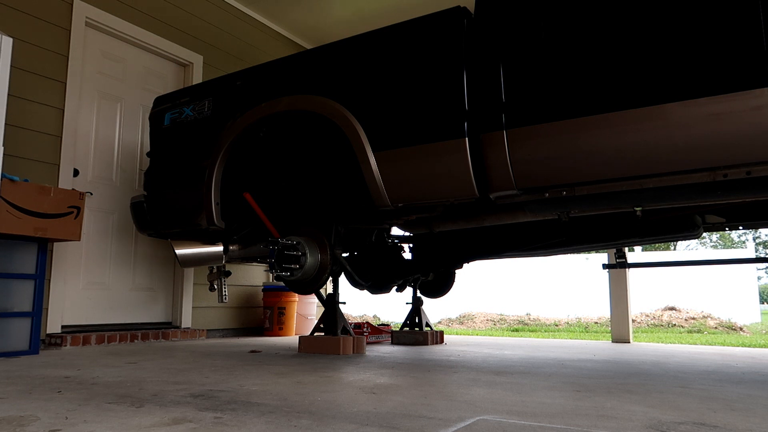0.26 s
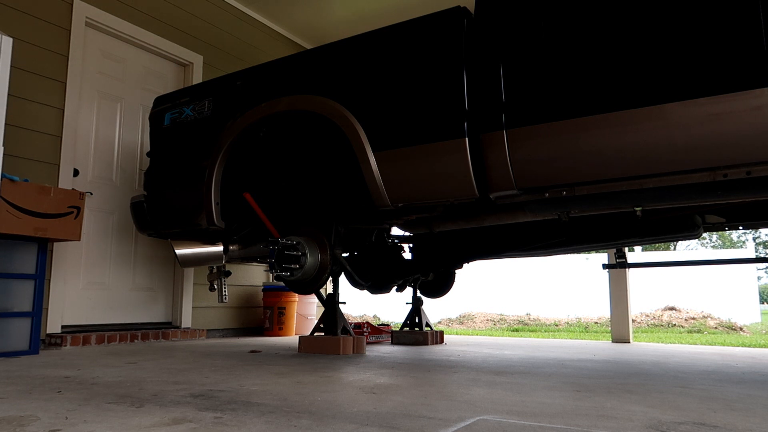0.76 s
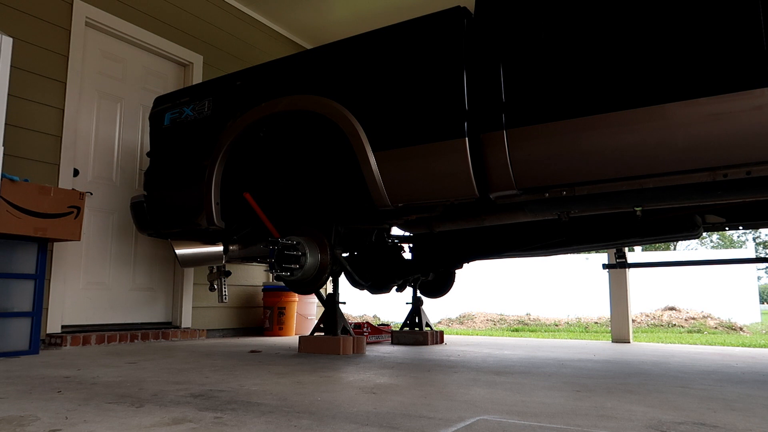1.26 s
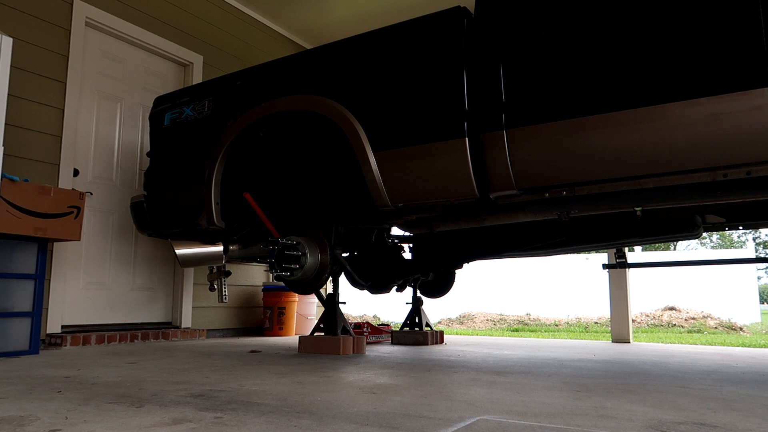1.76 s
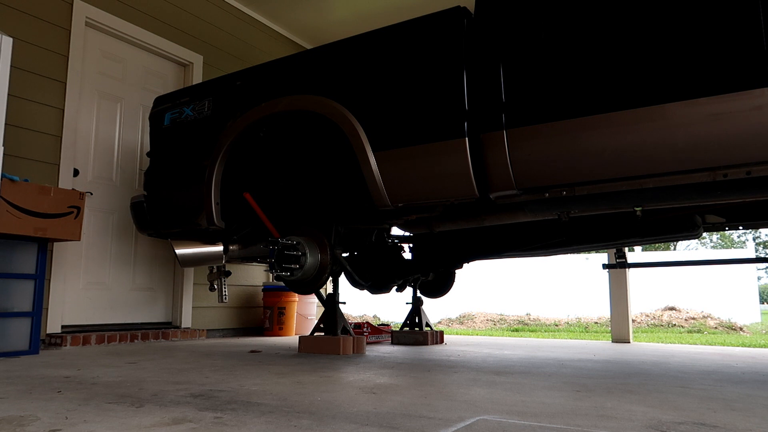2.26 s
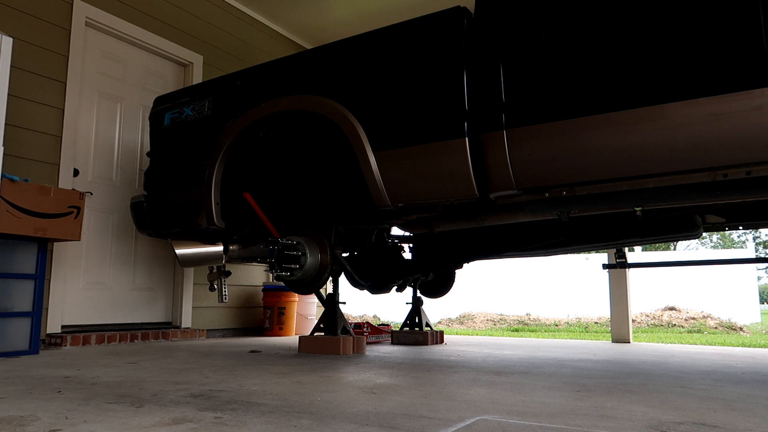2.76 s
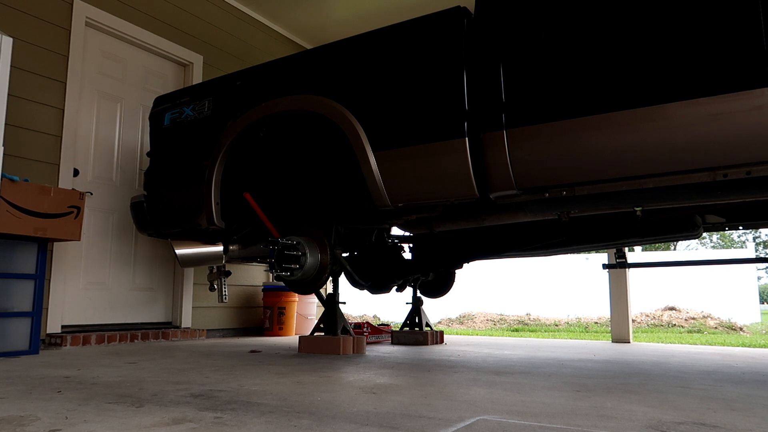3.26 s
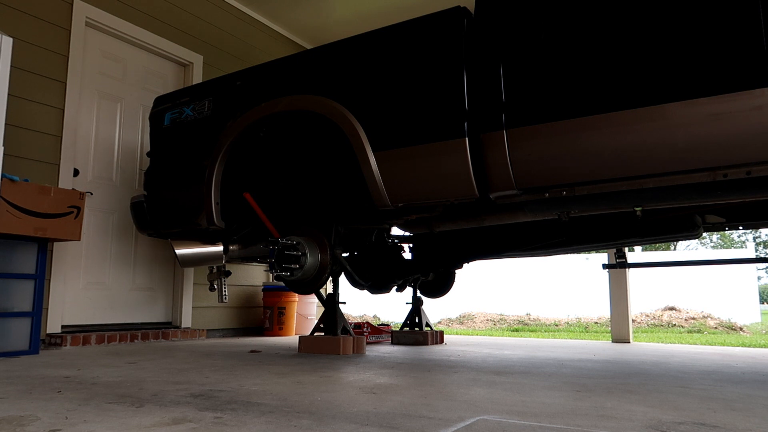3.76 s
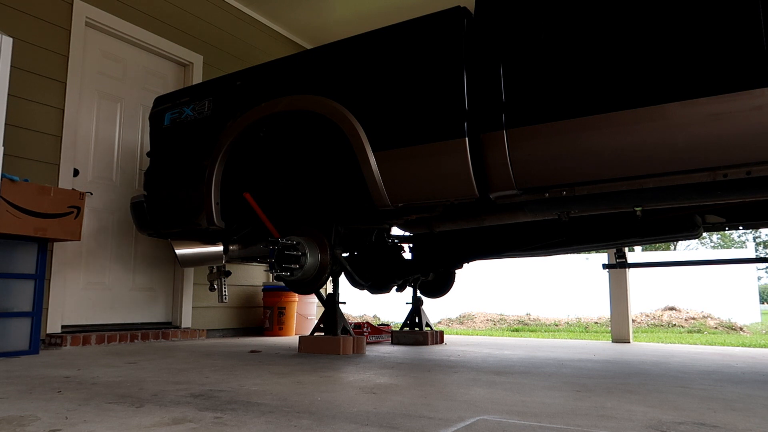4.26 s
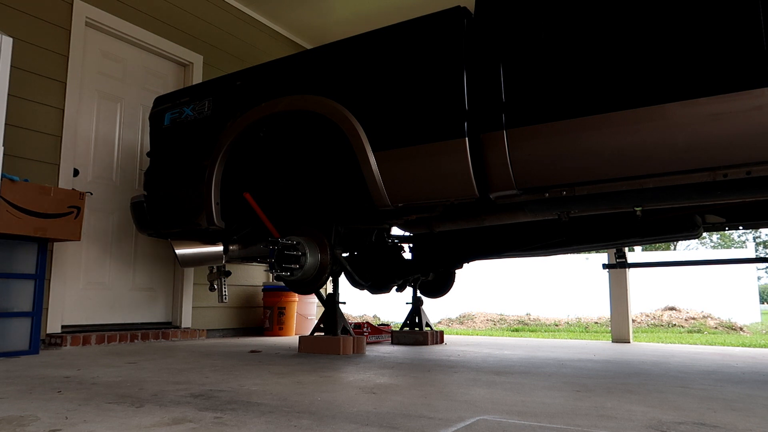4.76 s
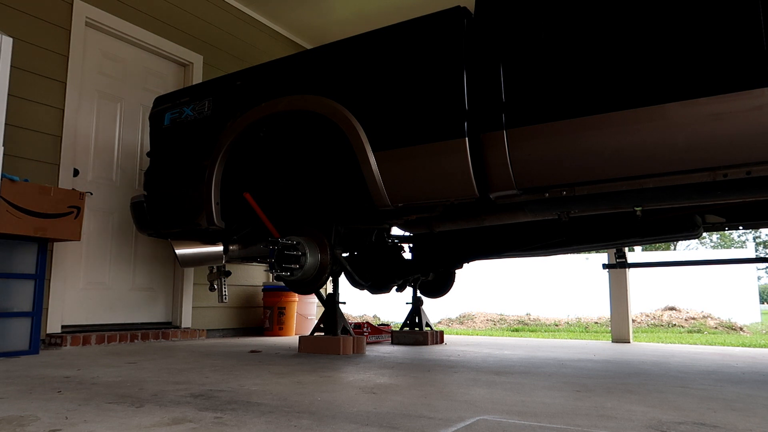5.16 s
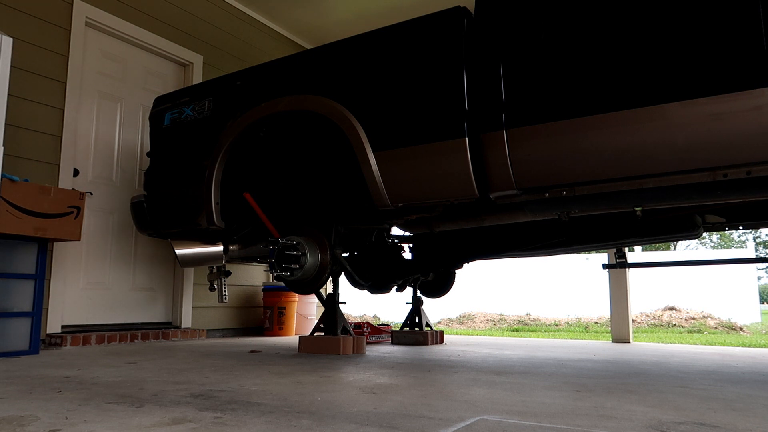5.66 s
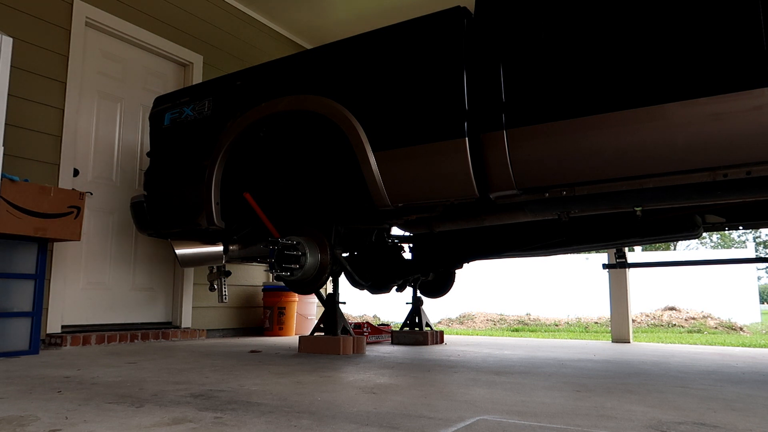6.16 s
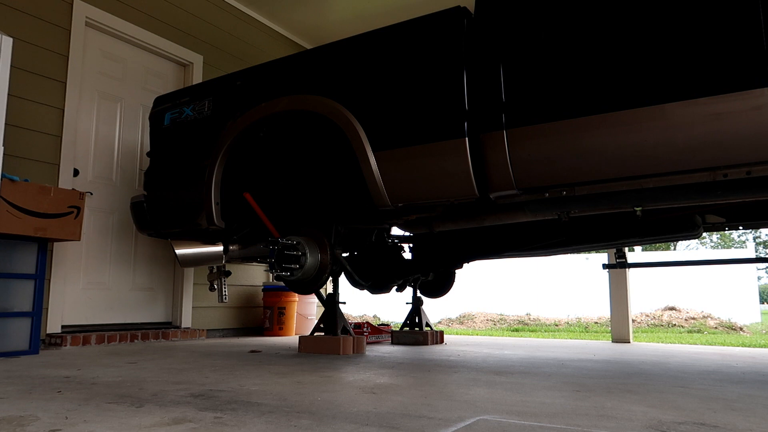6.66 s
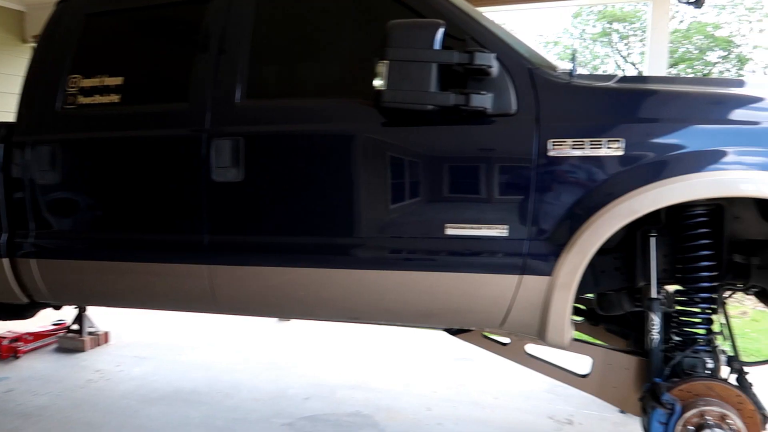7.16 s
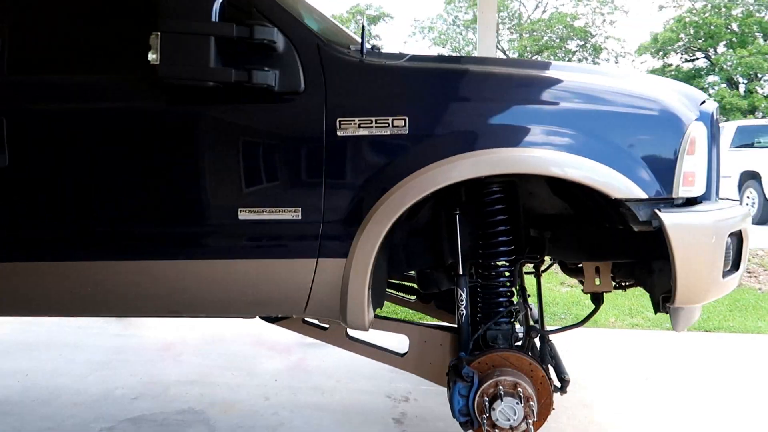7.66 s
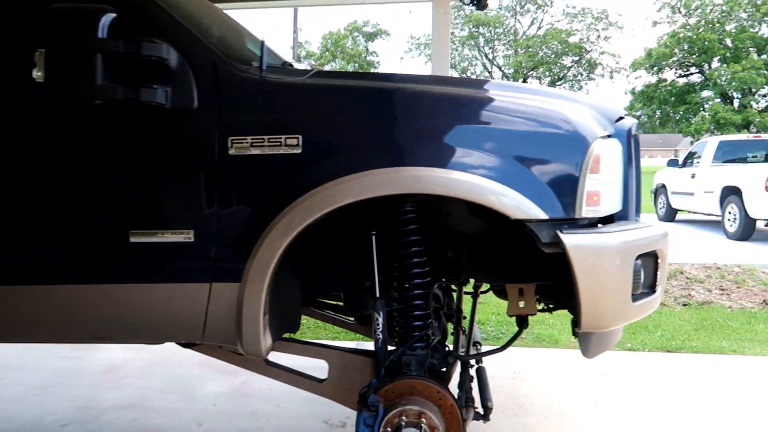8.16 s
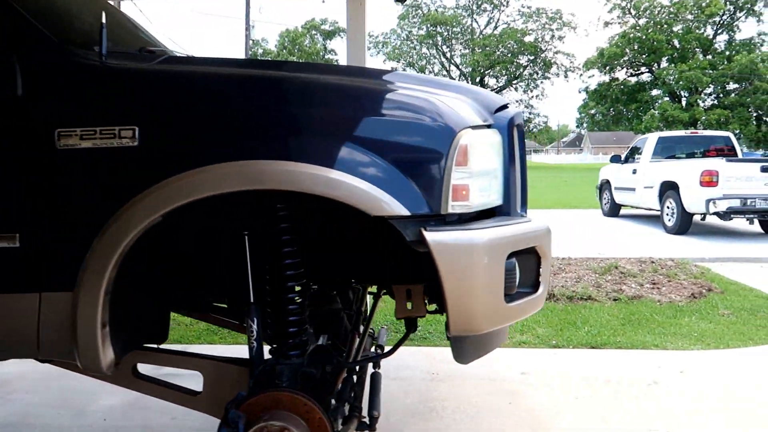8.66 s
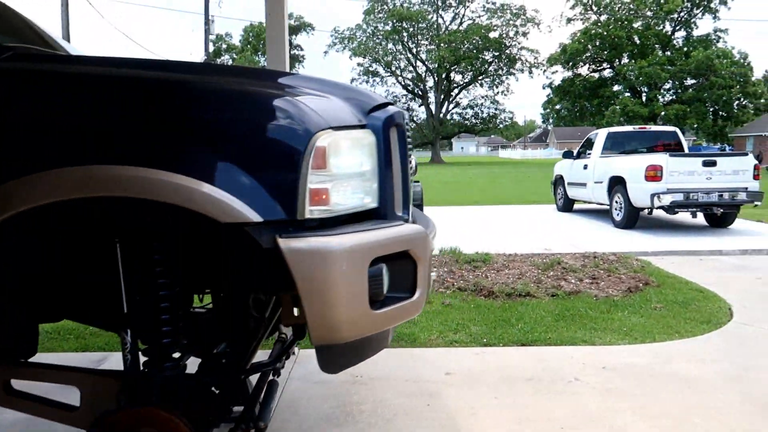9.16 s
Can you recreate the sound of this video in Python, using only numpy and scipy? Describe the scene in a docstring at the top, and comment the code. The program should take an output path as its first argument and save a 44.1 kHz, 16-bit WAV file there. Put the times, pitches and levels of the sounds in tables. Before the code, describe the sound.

A metallic clunk and rising gear whine lead into laboured cranking, each compression dragging the pitch down. The diesel fires hard, nearly dies, fires again and settles into rough loping. The microphone stands by the rear exhaust, with short reflections from slab and walls; then a sudden cut puts it beside the front wheel, with sharp injector clatter and less exhaust boom.

```python
"""A starter clunks in, whines up and cranks a V8 diesel pickup slowly on weak batteries under a carport.
Tooth mesh rings the starter housing. The engine fires with hard knocking, stumbles, catches and lopes:
firing orders and uneven pulses boom from the nearby tailpipe, with impacts and noise for clatter.
Then the listening place jumps to the front wheel, where the clatter of the engine dominates."""
import sys
import numpy as np
from scipy import signal
from scipy.fft import rfft, irfft, next_fast_len
from scipy.io import wavfile
from scipy.ndimage import uniform_filter1d

SR = 44100
rng = np.random.default_rng(int(sys.argv[2]) if len(sys.argv) > 2 else 0)


def wav_record(signal):
    """Record a signal, one row per channel, as 16-bit PCM in the file named by sys.argv[1]."""
    frames = np.transpose(np.atleast_2d(signal))
    bounded = np.clip(frames, -1, 1)
    # unit amplitude maps onto the largest positive 16-bit level
    quanta = np.round(bounded * 32767).astype(np.int16)
    wavfile.write(sys.argv[1], SR, quanta)


N = 414981
TIME = np.arange(N) / SR

# starter in, starter out, engine catches, listening place jumps to the front wheel
ENGAGE_S, RELEASE_S, CATCH_S, JUMP_S = 0.032, 2.462, 3.21, 7.265

# quiet outdoor air: (frequency [Hz], level [dB])
AIR_COLOUR = [(25, -4), (60, -0.5), (250, -5), (1000, -11.5), (4000, -27), (12000, -52)]
# stereo width while cranking, at the rear, at the front: (frequency [Hz], side less middle [dB])
WIDTH_CRANK = [(60, -52), (110, -44), (200, -67), (360, -22), (660, -21), (1200, -17.5), (2190, -10.5),
               (3980, -3), (7240, 1.5), (13200, 18)]
WIDTH_REAR = [(60, -26), (110, -13.5), (200, -14.5), (360, -19), (660, -21), (1200, -16.5), (2190, -11.5),
              (3980, -4), (7240, 0), (13200, 16)]
WIDTH_FRONT = [(60, -29), (110, -34), (200, -41), (360, -26), (660, -34), (1200, -19.5), (2190, -14.5),
               (3980, -5), (7240, -2), (13200, 15.5)]
# position of starter and engine before the microphone: (time [s], left less right [dB])
PAN = [(0, -1.6), (2.3, -1.4), (3, -.1), (7.25, 0), (7.7, .5), (9.4, 1.7)]

# pinion striking the ring gear: (frequency [Hz], level [dB])
CLUNK_COLOUR = [(60, -19), (200, -3), (300, 5), (460, -4), (900, -11), (1500, -8), (2000, -6), (3000, -17),
                (5500, -18.5), (8500, -28), (13000, -39)]
# starter runs up, is dragged down by the first compression and recovers:
# (time [s], tooth mesh [Hz], level of each whining harmonic, three columns [dB])
RUN_UP_PITCH = [(.06, 225, -32, -38, -37), (.125, 255.8, -16, -25, -26), (.165, 271, -17, -34, -21),
                (.19, 291, -18, -38, -18), (.215, 305.7, -29, -38, -14.5), (.243, 280.4, -12, -38, -24),
                (.285, 253, -26, -26, -40), (.325, 239.5, -30, -24, -43), (.365, 241, -34, -20, -40),
                (.395, 290, -36, -43, -42), (.425, 326, -27, -40, -27), (.462, 278, -15, -37, -33),
                (.495, 253, -24, -17, -34), (.53, 250.5, -32, -20.5, -40), (.56, 243.6, -32, -33, -42)]
# which multiples of the tooth mesh whine: (multiple)
WHINE_HARMONICS = [3, 5, 6]
OVERTONE_DB = -18  # each whine carries its octave

# starts of the first slow strokes: (time [s])
RUN_UP_STROKES = [-.04, .18, .432]
# compression strokes while cranking: (time [s], relative level of the chuff [dB])
COMPRESSIONS = [(.563, -20), (0.688, -18.5), (.818, -20), (.944, -17), (1.073, -19.5), (1.198, -21.5),
                (1.338, -20.5), (1.483, -21), (1.619, -18), (1.751, -22), (1.887, -21.5), (2.032, -24),
                (2.173, -23.5), (2.311, -24), (2.457, -22.5)]
# starter housing rings under each stroke: (frequency [Hz], width [Hz], relative level [dB],
# loudest place [share of stroke], length [share of stroke], swell before labouring deepens it [dB])
HOUSING = [(755.4, 35, -18.5, 0.45, 0.14, 12), (812, 35, -21.5, 0.54, 0.19, 11),
           (1205, 43, -19.5, .13, 0.044, 23), (1202, 130, -23, 0.42, 0.16, 10.5),
           (1946, 110, -37, 0.48, 0.28, 4)]
# gear rattle and growl: (frequency [Hz], level [dB])
RATTLE_COLOUR = [(21, -47), (35, -9), (64, -19), (142, -16.5), (278, -2), (357, -8), (649, -8), (754, -1.5),
                 (921, -4.5), (1210, -6), (1340, -9), (2000, -4), (3290, -20), (6780, -29.5),
                 (13600, -56.5)]
MESH_HZ, SAG_HZ_PER_S = 299.9, 8.2  # tooth mesh at the fast point of a stroke, as extrapolated to time 0
RING_EVEN_S = .018  # span over which the housing rings are levelled
LOAD_DB, LOAD_RISE_DB_PER_S = -1.5, 1.33  # how hard the teeth ring the housing
RATTLE_DB, RATTLE_FADE_DB_PER_S, RUN_UP_DB = -16.5, 1.05, -4  # rattle; its change during the run-up
GROWL_DB = -6  # beside the rattle
# the gears bite at once, hold for part of the stroke, then slacken until LATE_AT
BITE_SHARE, HOLD_SHARE, SLACK_DB = 0.079, 0.36, -5.5  # labouring scales the slack
LATE_DB, LATE_AT, LATE_SHARE = 0.5, 0.87, 0.054  # slight swell late in the stroke: level, place, length
CHUFF_HZ, CHUFF_RISE_S, SHUDDER_HZ, SHUDDER_DB = 256.2, 0.016, 47.1, 7

# engine speed: (time [s], firings per second [Hz])
SPEED = [(2.47, 14), (2.78, 47), (2.9, 48), (3.17, 42), (3.3, 46), (3.65, 48.9), (4.35, 49), (4.65, 47.8),
         (5.7, 46.25), (6.4, 46.55)]
FIRST_CYLINDER_S = 4.7648  # here the firing count is zero
# in firing order: (exhaust pulse strength [ratio], lateness [firing intervals], knock [dB])
CYLINDERS = [(1.6, .01, 1.2), (.7, 0, .2), (.95, .03, -1), (.75, .03, 0), (.8, .06, .3), (1.3, .03, -1),
             (1.2, 0, .4), (.75, .03, 1)]
# bursts of hard cold firing, each ending in a flare from the pipe:
# (start [s], end [s], knock [dB], flare relative to idle [dB])
BURSTS = [(2.46, 2.783, -20.5, 3), (3.108, 3.245, -23.5, -2.5)]
BURST_RISE_S, BURST_FALL_S, COAST_DB = 0.021, 0.05, -41  # between bursts the engine coasts
FLARE_LAG_S, FLARE_RISE_S, FLARE_FALL_S = 0.017, 0.031, 0.1
BURST_PUSH_DB, COAST_PUSH_DB = -16, -21  # exhaust strength relative to the idle
BUILD_S, BUILD_DB = 0.6, -3  # the idle takes this long to build, from this level
# how hard the idling engine works: (time [s], reference level for clatter and rush [dB])
EFFORT = [(3.45, -32.5), (3.48, -31.5), (4.34, -28), (4.39, -31.5), (4.62, -34.5), (5.18, -35), (6.05, -30),
          (7.2, -31)]
# clatter and gas rush follow the effort fully, the boom by a share
CLATTER_DB, RUSH_DB, LOPE_DB, BOOM_FOLLOWS = 5, 7.5, -22.5, 0.16
# firing orders of the boom: (multiple of firing rate, relative level [dB], change once settled [dB],
# cold lope [dB])
MAIN_ORDERS = [(2, -21.5, 2.5, 1.5), (3, -29.5, -10, 4), (4, -24.5, -1.5, -3), (5, -21, -1.5, -0.5)]
# fainter orders: (multiple of firing rate, relative level [dB])
MINOR_ORDERS = [(1, -37.5), (6.375, -34), (8.25, -42), (9.125, -39), (12.25, -45), (13, -46)]
# an order swells as it crosses these pipe resonances: (frequency [Hz], width [Hz], swell [dB])
PIPE_MODES = [(143.5, 5.5, 9), (241.3, 11, 4)]
# uneven pulses from the pipe: (frequency [Hz], level [dB])
PIPE = [(25, -40), (45, -24), (64, 0), (100, -9), (125, 2), (165, 5), (205, 21.5), (250, 19), (300, 5),
        (330, -12.5), (420, -0.5), (520, -36), (620, -16), (900, -63)]
# gas rushing from the pipe: (frequency [Hz], level [dB])
RUSH_COLOUR = [(25, -30), (45, -15), (65, 2.5), (130, 0.5), (280, -7.5), (430, -5.5), (540, -18),
               (620, -7.5), (900, -48), (2000, -73)]
SETTLE_S, SETTLING_S = 5.3, 0.46  # when the idle begins to settle, and how long it takes
COLD_LOPE_AT, WARM_S = 0.4, 4.34  # cold boom swells at this share of each engine cycle, until this time
RAGGED_DB = -5.5  # ragged firing weakens the clean orders, per unit of scatter
# engine noise that returns alike in every cycle: (frequency [Hz], share of power [ratio])
REPEATS = [(150, .98), (450, .85), (1000, .4), (2000, .12), (4000, .02)]
COLD_REPEATS = .5  # cold share of the repeating noise

# hard cold knocking: (frequency [Hz], level [dB])
KNOCK_COLOUR = [(100, -6), (200, -4.5), (340, -2.5), (600, -6.5), (730, -7.5), (1230, -3.5), (1860, -5.5),
                (2880, -9.5), (4370, -22), (6000, -21.5), (9400, -26.5), (10300, -42), (13600, -51)]
# idle clatter heard from the rear, from the front: (frequency [Hz], level [dB])
REAR_COLOUR = [(350, -3), (600, -7.5), (832, -12), (948, -8.5), (1230, -9), (1350, -8.5), (1780, -15.5),
               (2990, -18.5), (4610, -30), (5050, -30.5), (5760, -34), (8300, -37.5), (11800, -54),
               (12800, -53), (13600, -101)]
FRONT_COLOUR = [(150, -39), (250, -38), (272, -28), (367, -4), (568, -13), (754, -7), (907, -7), (1270, -3),
                (1380, -4.5), (2880, -11), (4160, -21.5), (5080, -23.5), (8260, -32), (11900, -45),
                (13600, -50)]
# engine casting resonances: (frequency [Hz], width [Hz], lift [dB])
BLOCK = [(757, 56, 2.5), (1250, 90, -1), (2890, 190, 3), (5060, 270, 6), (8270, 380, 3)]
# single hard firings within, between and after the bursts: (time [s], level [dB])
HARD_FIRINGS = [(2.473, -16), (2.547, -11.5), (2.601, -13.5), (2.645, -15), (2.684, -14), (2.711, -19),
                (2.738, -17.5), (2.764, -17), (2.788, -21), (3.012, -37), (3.038, -38), (3.063, -30.5),
                (3.093, -25.5), (3.124, -22), (3.152, -24), (3.19, -21), (3.215, -26)]
HARD_FIRING_RISE_S, HARD_FIRING_FALL_S = .003, 0.021
KNOCK_START_S = 2.468
# each firing knocks, then dies away:
# (place [firing intervals], depth before each cylinder's own knock [dB], decay [firing intervals])
REAR_KNOCK = (.4, 2.8, .25)
FRONT_KNOCK = (.35, 3.6, .5)
FIRING_SCATTER_DB = .5

# single hard pops from the pipe as cold cylinders fire: (time [s], level [dB])
POPS = [(2.793, -5), (2.815, -6), (2.838, -9), (3.24, -12.5), (3.26, -9), (3.303, -9), (3.475, -6.5),
        (4.11, -16), (4.37, -5)]
POP_WIDTH_S = 0.0013

# hum of the engine bay: (multiple of firing rate, level [dB])
BAY_ORDERS = [(1, -39.5), (2.001, -45), (2.499, -32.5), (3, -39.5), (3.999, -40), (4.75, -39),
              (5.25, -49.5), (8.001, -41)]
# throb and rumble of the engine bay: (frequency [Hz], level [dB])
BAY_COLOUR = [(30, -18), (55, -11), (90, 7), (125, 8), (220, 8), (290, 0), (370, 2.5), (500, -43),
              (900, -35), (4000, -70)]
FRONT_DB, FRONT_FADE_DB_PER_S = -16, 1.0  # clatter at the front wheel, fading as the listener moves on
BAY_DB, BAY_FADE_DB_PER_S = -25.5, 3  # about the level of throb and rumble there
PANEL_HZ, PANEL_WIDTH_HZ, PANEL_DB, PANEL_FADE_DB_PER_S = 1239, 59, -23.5, 4

CEILING, EDGE_HZ = 0.74, 13300  # peaks round off towards the ceiling; upper band limit


def amp(db):
    """Decibels to gain."""
    return 10 ** (np.asarray(db) / 20)


def evened(x):
    """Scales to rms 1."""
    return x / np.sqrt(np.mean(x ** 2) + 1e-20)


def curves(rows):
    """The columns of a table of timed rows, sample by sample."""
    s, *columns = np.transpose(rows)
    return [np.interp(TIME, s, c) for c in columns]


def bump(hz, centre, width, lift_db):
    """Decibels that a resonance adds at a frequency."""
    return lift_db / (1 + (2 * (hz - centre) / width) ** 2)


def colour(x, points, modes=()):
    """Filters by a smooth spectrum with resonant bumps on it."""
    size = next_fast_len(N)
    hz = np.fft.rfftfreq(size, 1 / SR)
    f, db = np.transpose(points)
    shape_db = np.interp(np.log(hz + 1), np.log(f + 1), db)
    shape_db = shape_db + sum(bump(hz, *mode) for mode in modes)
    return irfft(rfft(x, size) * amp(shape_db), size)[..., :N]


def wander(hz):
    """Smooth chance of rms 1 that changes hz times a second."""
    return evened(np.interp(TIME * hz, np.arange(N // 8), rng.standard_normal(N // 8)))


def gate(start, end, rise, fall):
    """Opens from start and shuts after end; all in seconds."""
    return np.clip((TIME - start) / rise, 0, 1) * np.clip(1 - (TIME - end) / fall, 0, 1)


def resonate(x, hz, width):
    """A steep resonance: the same peak filter twice."""
    b, a = signal.iirpeak(hz, hz / (1.45 * width), SR)
    return signal.lfilter(b, a, signal.lfilter(b, a, x))


def add(mix, start, sound):
    """Mixes a sound in from a sample on."""
    part = mix[..., start:start + sound.shape[-1]]
    part += sound[..., :part.shape[-1]]


def spread(pair, width):
    """Two unrelated signals become the middle and the sides of a stereo sound."""
    side = colour(pair[1], width)
    return np.array([pair[0] + side, pair[0] - side])


def carport(x, t60, wet_db):
    """Slab, wall and roof add dense short echoes."""
    t = np.arange(SR // 2) / SR
    echoes = rng.standard_normal(len(t)) * (rng.random(len(t)) < .05)
    tail = echoes * amp(-60 * t / t60) * (t > .004)
    wet = signal.oaconvolve(x, tail / np.linalg.norm(tail))[:N]
    return (x + amp(wet_db) * wet) / np.hypot(1, amp(wet_db))


def clatter(envelope, spectrum, width, grain_db, modes=(), hits=0, fired=None):
    """Swarms of small impacts and larger hits ring in castings and bodywork, following any engine cycle."""
    small = rng.standard_normal((2, N))
    if fired is not None:
        small[0] = cycling(fired)
    swarm = (small * amp(grain_db * wander(450)) + hits) * envelope
    rung = np.array([carport(x, t60=0.12, wet_db=-8) for x in swarm])
    return spread(evened(colour(rung, spectrum, modes)), width)


def cycling(count, warm=1):
    """Noise whose lower part repeats each engine cycle, more so when warm, while the treble is always new."""
    orders = np.arange(4097)
    phases = np.exp(2j * np.pi * rng.random(len(orders)))
    strengths = amp(2.35 * rng.standard_normal(len(orders)))
    uneven_only = orders % len(CYLINDERS) > 0  # leaves out what all cylinders share
    cycle = evened(irfft(phases * strengths * uneven_only))
    place = np.arange(len(cycle)) / len(cycle)
    same = np.interp(count / len(CYLINDERS), place, cycle, period=1)
    low, high = rng.standard_normal((2, N))
    repeated = np.sqrt(warm) * same + np.sqrt(1 - warm) * low
    repeat_colour = [(hz, 10 * np.log10(share)) for hz, share in REPEATS]
    new_colour = [(hz, 10 * np.log10(1 - share)) for hz, share in REPEATS]
    return colour(repeated, repeat_colour) + colour(high, new_colour)


def outdoor_air():
    """Steady coloured noise stands for quiet air around the carport."""
    return amp(-34) * evened(colour(rng.standard_normal(N), AIR_COLOUR))


def engagement():
    """The solenoid slams the pinion in with a clunk, and the motor whines up to speed."""
    age = np.maximum(TIME - ENGAGE_S, 0)
    crash = clatter(1, CLUNK_COLOUR, WIDTH_CRANK, grain_db=-2.5) * amp(-14.0 - 60 * age / 0.48)
    thud = np.sin(2 * np.pi * 280 * age) * amp(-11.5) * np.exp(-((TIME - .06) / 0.012) ** 2)
    mesh_hz, *levels_db = curves(RUN_UP_PITCH)
    teeth = 2 * np.pi * np.cumsum(mesh_hz * (1 + .012 * wander(400))) / SR
    whine = 0
    for k, db in zip(WHINE_HARMONICS, levels_db):
        whine = whine + amp(db) * (np.sin(k * teeth) + amp(OVERTONE_DB) * np.sin(2 * k * teeth))
    whine = whine * amp(2.5 * wander(141.7)) * gate(ENGAGE_S, .55, .01, 0.044)
    whine = carport(whine, t60=.15, wet_db=-7)
    return (crash + thud + whine) * gate(ENGAGE_S, 0.72, 0.0054, .1)


def strokes():
    """The count of compression strokes so far, with its fraction."""
    times = np.concatenate([RUN_UP_STROKES, np.transpose(COMPRESSIONS)[0]])
    return np.interp(TIME, times, np.arange(len(times)))


def housing_rings(mesh, stroke, labour):
    """Tooth mesh and noise ring the starter housing, each resonance loudest at its place in the stroke."""
    drive = carport(mesh, t60=.3, wet_db=-2) + .4 * rng.standard_normal(N)
    rings = 0
    for hz, width, db, loudest, length, swell_db in HOUSING:
        ring = resonate(drive, hz, width)
        # levelled, so that chance swells of the ring are evened out
        ring = ring / np.sqrt(abs(uniform_filter1d(ring ** 2, int(RING_EVEN_S * SR))) + 1e-12)
        away = (stroke - loudest + .5) % 1 - .5
        rings = rings + ring * amp(db + labour * swell_db * (np.exp(-(away / length) ** 2) - 1))
    return rings * amp(LOAD_DB + LOAD_RISE_DB_PER_S * TIME)


def starter():
    """The pinion drives the ring gear; every compression drags the pitch down and loads the teeth."""
    stroke = strokes()
    share = stroke % 1
    labour = np.interp(TIME, [.5, 2.3], [.8, 1.25])  # the chugs deepen as the batteries sag
    top_hz = MESH_HZ - SAG_HZ_PER_S * TIME
    mesh_hz = top_hz * (1 - .27 * np.sin(np.pi * (stroke - .07)) ** 2)
    teeth = 2 * np.pi * np.cumsum(mesh_hz * (1 + 0.0134 * wander(250))) / SR
    mesh = evened(sum(np.cos(k * teeth) for k in range(2, 11)))
    rings = housing_rings(mesh, stroke, labour) * gate(0.515, RELEASE_S - .05, 0.075, 0.055)

    loaded = gate(RUN_UP_STROKES[1] + .05, RELEASE_S - .035, .02, 0.044)
    slack = np.interp(share, [0, BITE_SHARE, HOLD_SHARE, LATE_AT], [1, 0, 0, 1]) * loaded
    strain = amp(SLACK_DB * labour * slack + 0.94 * wander(130))
    rattle = clatter(strain * amp(0.14 * np.cos(teeth)), RATTLE_COLOUR, WIDTH_CRANK, grain_db=0.5)
    # the upper mesh harmonics growl down and up through the bell housing
    growl = evened(colour(carport(mesh, t60=0.47, wet_db=-19), RATTLE_COLOUR)) * strain
    run_up_db = RUN_UP_DB * (1 - gate(0.4, JUMP_S, 0.22, .1))
    gears = (rattle + amp(GROWL_DB) * growl) * amp(RATTLE_DB - RATTLE_FADE_DB_PER_S * TIME + run_up_db)
    late_swell = amp(LATE_DB * np.exp(-((share - LATE_AT) / LATE_SHARE) ** 2) * loaded)
    return late_swell * (rings + gears * gate(ENGAGE_S, RELEASE_S, 0.026, 0.082))


def chuffs():
    """Every compression stroke opens with a low, shuddering chuff of tone and resonant noise."""
    t = np.arange(SR // 6) / SR
    shudder = amp(SHUDDER_DB * np.cos(2 * np.pi * SHUDDER_HZ * (t - .008)))
    shape = t / CHUFF_RISE_S * np.exp(1 - t / CHUFF_RISE_S) * shudder
    out = np.zeros(N)
    for s, db in COMPRESSIONS:
        breath = evened(resonate(rng.standard_normal(len(t)), 263, 99))
        gas = np.sin(2 * np.pi * CHUFF_HZ * t) + .5 * breath
        add(out, round(s * SR), amp(db) * shape * gas)
    return out


def firings():
    """The count of firings so far, with its fraction."""
    count = np.cumsum(curves(SPEED)[0]) / SR
    return count - np.interp(FIRST_CYLINDER_S, TIME, count)


def burst(start, end):
    """Cold firing builds up, holds and dies away."""
    build = 1 - np.exp(-np.maximum(TIME - start, 0) / BURST_RISE_S)
    return build * np.exp(-np.maximum(TIME - end, 0) / BURST_FALL_S)


def push():
    """Exhaust strength, 1 at built-up idle: weak while the engine coasts, flaring just after each burst."""
    build = amp(BUILD_DB * (1 - gate(CATCH_S, JUMP_S, BUILD_S, .1)))
    idle = gate(CATCH_S, JUMP_S, 0.032, .1) * build
    strength = amp(COAST_PUSH_DB) + (1 - amp(COAST_PUSH_DB)) * idle
    for start, end, _, flare_db in BURSTS:
        age = TIME - end - FLARE_LAG_S
        flare = np.exp(-np.maximum(-age / FLARE_RISE_S, age / FLARE_FALL_S))
        strength = strength + amp(BURST_PUSH_DB) * burst(start, end) + amp(flare_db) * flare
    return strength


def lope(count, scatter, spectrum, lead):
    """Strong, weak, early and late cylinders: how the pulses depart from an even train."""
    strength, late, _ = np.transpose(CYLINDERS)
    number = np.arange(np.ceil(count[0]) + 1, count[-1] - 1).astype(int)
    even_at = np.searchsorted(count, number - lead)
    chance = rng.standard_normal((len(number), 2)).T * scatter[even_at]
    lateness = late[number % 8] - late.mean() + 0.16 * chance[1]
    true_at = np.searchsorted(count, number - lead + lateness)
    pulses = np.zeros(N)
    pulses[np.minimum(true_at, N - 1)] = strength[number % 8] / strength.mean() + chance[0]
    pulses[even_at] -= 1
    boom = colour(pulses, spectrum)
    return boom / np.sqrt(abs(uniform_filter1d(boom ** 2, SR // 3)) + 1e-12)


def exhaust_orders(count, scatter):
    """Multiples of the firing rate boom in the pipe and swell as they cross its resonances."""
    speed = curves(SPEED)[0]
    settled = gate(SETTLE_S, JUMP_S, SETTLING_S, .1)
    turn = 2 * np.pi * (count + 0.019 * scatter * wander(40))
    lope_swing = np.cos(2 * np.pi * (count / len(CYLINDERS) - COLD_LOPE_AT))
    cold_lope = lope_swing * gate(CATCH_S, WARM_S, 0.22, 0.15)
    dispersion = .1  # the pipe delays the orders unequally [radians], which rounds off each pulse
    boom = 0
    for k, db, change_db, lope_db in MAIN_ORDERS:
        swell_db = sum(bump(k * speed, *mode) for mode in PIPE_MODES)
        level = amp(db + change_db * settled + lope_db * cold_lope + swell_db)
        boom = boom + level * np.cos(k * turn - dispersion * (k - 2) ** 2)
    minor = sum(amp(db) * np.cos(k * turn) for k, db in MINOR_ORDERS)
    return boom + minor * gate(2.9, JUMP_S, 0.71, 0.0087), turn


def tailpipe(count):
    """Orders, uneven pulses and gas rush leave the pipe; ragged combustion grows steadier."""
    effort_db = curves(EFFORT)[0]
    scatter = np.interp(TIME, [2.8, 4.7], [0.44, 0.034])
    boom, turn = exhaust_orders(count, scatter)
    uneven = lope(count, scatter, PIPE, lead=-.012) * amp(LOPE_DB)
    warmth = np.clip((TIME - CATCH_S) / (WARM_S - CATCH_S), 0, 1)
    warm = COLD_REPEATS + (1 - COLD_REPEATS) * warmth
    puffs = cycling(count, warm) * amp(2.0 * np.cos(turn))
    rush = evened(colour(puffs, RUSH_COLOUR)) * amp(effort_db + RUSH_DB)
    pulses = np.sqrt(2) * boom * amp(RAGGED_DB * scatter) + uneven
    pulses = pulses * amp(BOOM_FOLLOWS * (effort_db - effort_db.mean()))
    return (pulses + rush) * push() * gate(RELEASE_S, JUMP_S, .02, 0.005)


def impacts(fired, scatter_db, ring_s, count):
    """Valves and injectors: each part strikes at its place in the cycle with its own ring and varied force."""
    t = np.arange(SR // 50) / SR
    places = (np.arange(count) + rng.random(count)) / count
    pitches = rng.permutation(np.linspace(700, 5500, count))
    cycles = np.arange(fired[0], fired[-1], len(CYLINDERS))
    out = np.zeros((2, N))
    for place, hz in zip(places, pitches):
        crack = rng.standard_normal((2, len(t)))
        ring = evened((crack + .4 * evened(resonate(crack, hz, 900))) * np.exp(-t / ring_s))
        late = .02 * rng.standard_normal(len(cycles))  # in firing intervals
        for start in np.searchsorted(fired, cycles + place * len(CYLINDERS) + late):
            add(out, start, ring * amp(scatter_db * rng.uniform(-1, 1)))
    return evened(out)


def knocks(count, knock, sway_db, loudest):
    """The clatter jumps with each firing and sways over the eight cylinders, most at the loudest one."""
    at, depth_db, decay = knock
    cycle = 2 * np.pi * (count - loudest) / len(CYLINDERS)
    place = count - at + .05 * wander(47)
    number = np.floor(place).astype(int)
    cylinder_db = np.transpose(CYLINDERS)[2][number % len(CYLINDERS)]
    cylinder_db = cylinder_db + FIRING_SCATTER_DB * rng.standard_normal(512)[number]
    knock_db = (depth_db + cylinder_db) * np.exp(-(place % 1) / decay)
    return amp(knock_db + sway_db * (np.cos(cycle) + np.cos(2 * cycle)))


def block_rasp():
    """The hardest firings rasp in two resonances of the block."""
    lower = evened(resonate(rng.standard_normal(N), 2810, 490))
    upper = evened(resonate(rng.standard_normal(N), 5900, 740))
    lower_db = np.interp(TIME, [2.5, 2.72, 3.2], [-16, -4, -5])
    upper_db = np.interp(TIME, [2.5, 2.7, 3.1], [-19, -16, -28])
    return lower * amp(lower_db) + upper * amp(upper_db)


def cold_firing():
    """Strength of the cold knocking: bursts, coasting and single hard firings add as powers."""
    bursts = sum(amp(db) * burst(start, end) for start, end, db, _ in BURSTS)
    power = (bursts + amp(COAST_DB) * gate(RELEASE_S, CATCH_S, .01, 0.089)) ** 2
    for s, db in HARD_FIRINGS:
        hit = gate(s, JUMP_S, HARD_FIRING_RISE_S, .1) * np.exp(-abs(TIME - s) / HARD_FIRING_FALL_S)
        power = power + (amp(db) * hit) ** 2
    return np.sqrt(power)


def engine_from_rear(count):
    """Hard cold knocking as the engine catches, then a soft distant clatter."""
    loose = impacts(count, scatter_db=4, ring_s=.004, count=56)
    cold = clatter(1, KNOCK_COLOUR, WIDTH_CRANK, grain_db=0.5,
                   modes=[(2980, 130, 4.6), (5860, 510, 4.1)], hits=0.51 * loose)
    cold = (cold + block_rasp()) * cold_firing() * gate(KNOCK_START_S, JUMP_S, .006, .1)
    ticks = impacts(count, scatter_db=2, ring_s=.005, count=64)
    beat = knocks(count, REAR_KNOCK, sway_db=.6, loudest=2.7)
    idle = clatter(beat, REAR_COLOUR, WIDTH_REAR, grain_db=0.5, modes=BLOCK, hits=.45 * ticks, fired=count)
    return cold + idle * amp(curves(EFFORT)[0] + CLATTER_DB) * gate(3.25, JUMP_S, 0.012, .004)


def pops():
    """A cold cylinder lights late and slaps one hard pulse out of the pipe."""
    t = np.arange(-SR // 100, SR // 100) / SR
    u = (t / POP_WIDTH_S) ** 2
    out = np.zeros(N)
    for s, db in POPS:
        add(out, round((s + t[0]) * SR), amp(db) * (1 - u) * np.exp(-u / 2))
    return out


def engine_bay(count, age):
    """Firing orders hum, uneven pulses throb and cycling noise rumbles in the engine bay."""
    hum = np.sqrt(2) * sum(amp(db) * np.cos(2 * np.pi * k * count) for k, db in BAY_ORDERS)
    throb = lope(count, np.full(N, .06), BAY_COLOUR, lead=0.512)
    rumble = evened(colour(cycling(count), BAY_COLOUR))
    low = 0.97 * carport(throb, t60=0.5, wet_db=-3.0) + 0.98 * rumble
    return hum + low * amp(BAY_DB - BAY_FADE_DB_PER_S * age)


def engine_from_front(count):
    """Close injector and combustion clatter and a ringing panel, over the engine bay."""
    age = np.maximum(TIME - JUMP_S, 0)
    ticks = impacts(count, scatter_db=2.5, ring_s=.002, count=64)
    beat = knocks(count, FRONT_KNOCK, sway_db=.4, loudest=7.7)
    close = clatter(beat, FRONT_COLOUR, WIDTH_FRONT, grain_db=1.0, modes=BLOCK, hits=0.41 * ticks,
                    fired=count)
    close = close * amp(FRONT_DB - FRONT_FADE_DB_PER_S * age)
    # a panel rings beside the front wheel
    panel = evened(resonate(cycling(count) * beat, PANEL_HZ, PANEL_WIDTH_HZ))
    panel = panel * amp(PANEL_DB - PANEL_FADE_DB_PER_S * age)
    return (close + panel + engine_bay(count, age)) * gate(JUMP_S, TIME[-1], .004, .01)


def placed(x):
    """The engine lies to one side: that ear hears it louder, and its lower tones a little earlier."""
    pan_db = curves(PAN)[0]
    lows = signal.sosfiltfilt(signal.butter(2, 2500, fs=SR, output="sos"), x.mean(0))
    early = .5 * pan_db * np.gradient(lows)  # slope times lead: a small shift in time
    return (x + np.outer([1, -1], early)) * amp(np.outer([.5, -.5], pan_db))


def scene():
    """Starter and engine to one side, the exhaust in the middle, over quiet outdoor air."""
    air = outdoor_air()
    cranking = engagement() + starter() + chuffs()
    count = firings()
    exhaust = tailpipe(count) + pops()
    engine = engine_from_rear(count) + engine_from_front(count)
    return placed(cranking + engine) + exhaust + air


def record(dry):
    """The microphone sheds the deepest bass; the recorder rounds off peaks with a soft limiter, then limits the
    band."""
    lean = signal.sosfiltfilt(signal.butter(6, 37, "high", fs=SR, output="sos"), dry)
    rounded = lean / (1 + (lean / CEILING) ** 4) ** .25
    band_limit = signal.firwin(255, EDGE_HZ, window=("kaiser", 9), fs=SR)
    return signal.oaconvolve(rounded, band_limit[None], "same")


dry = scene()
out = record(dry)
wav_record(out)
```